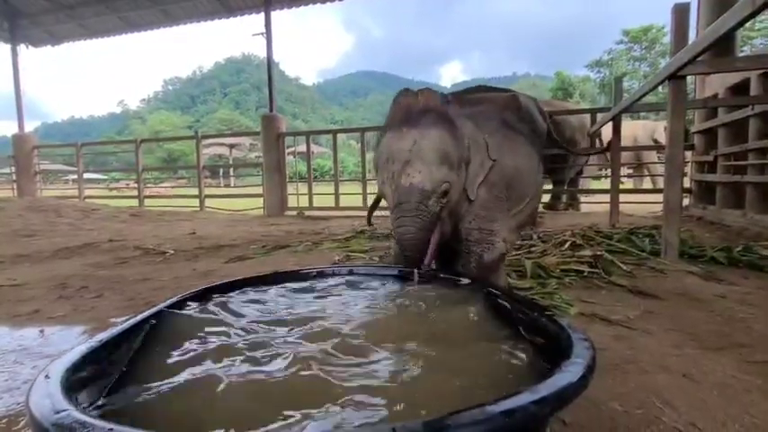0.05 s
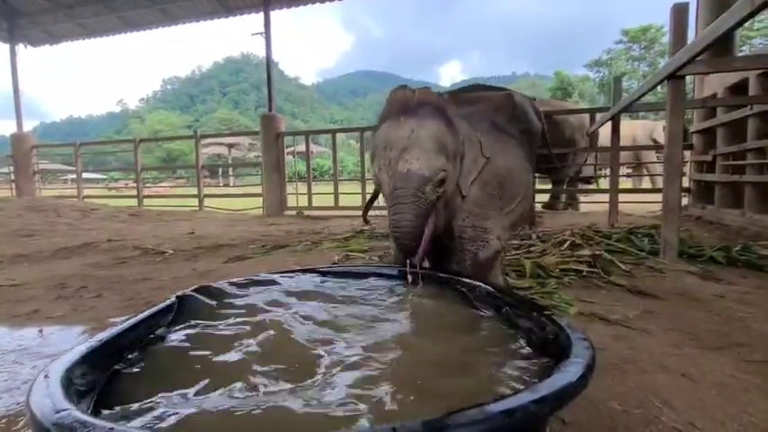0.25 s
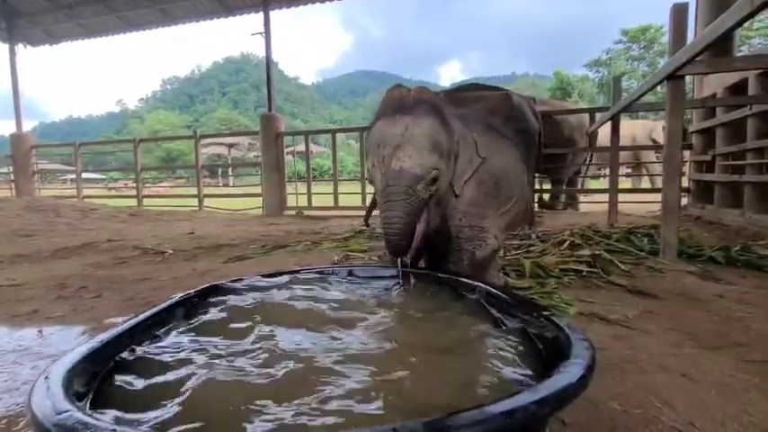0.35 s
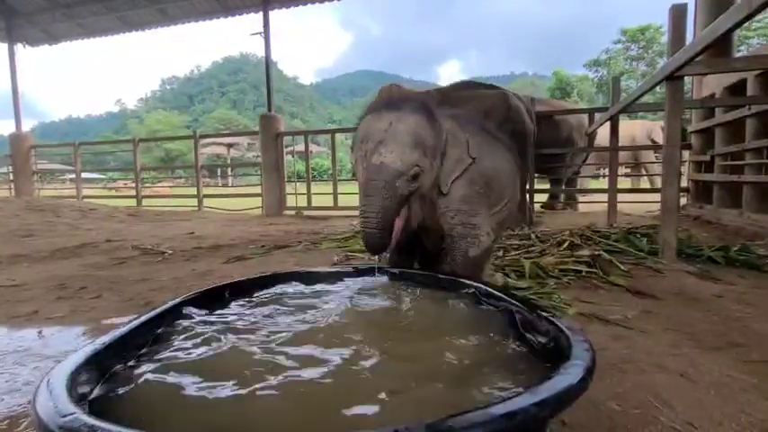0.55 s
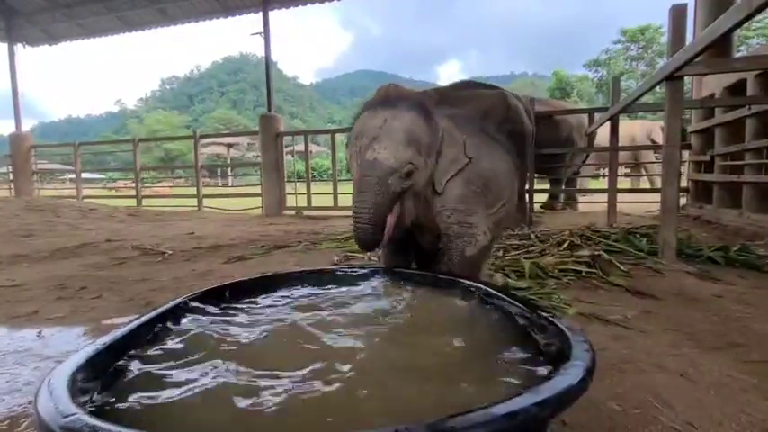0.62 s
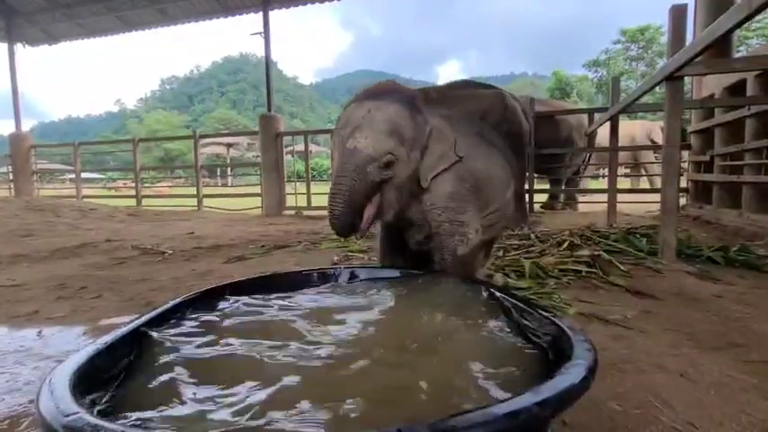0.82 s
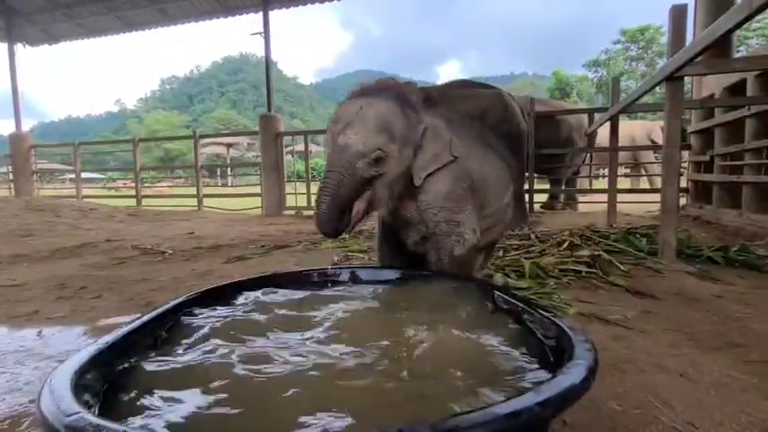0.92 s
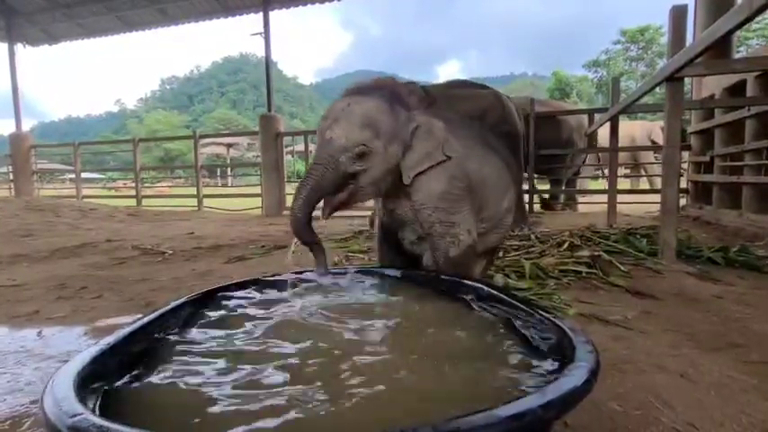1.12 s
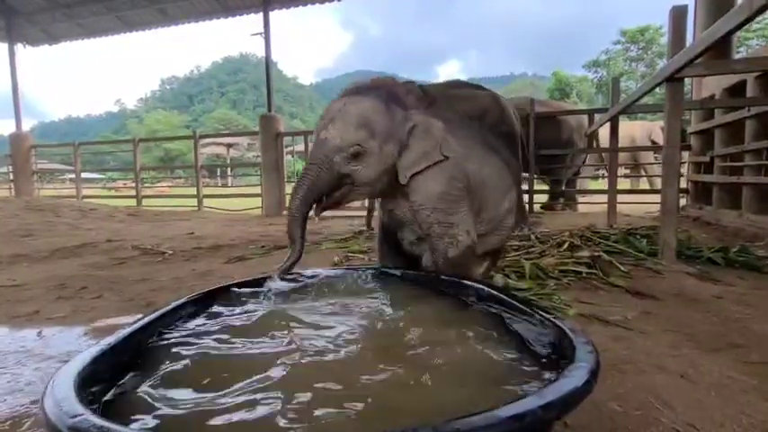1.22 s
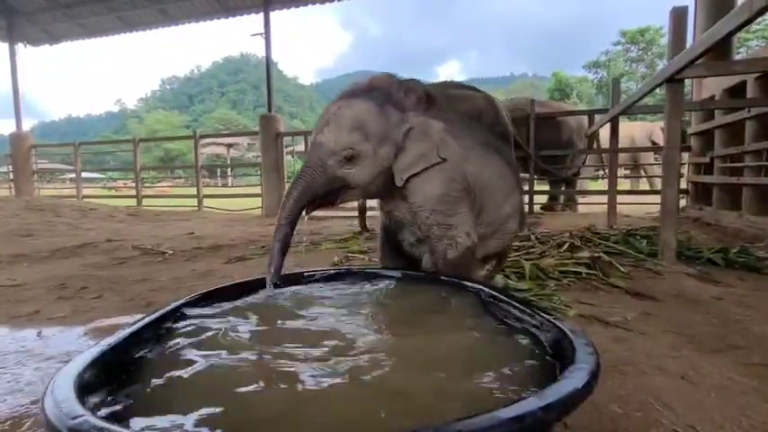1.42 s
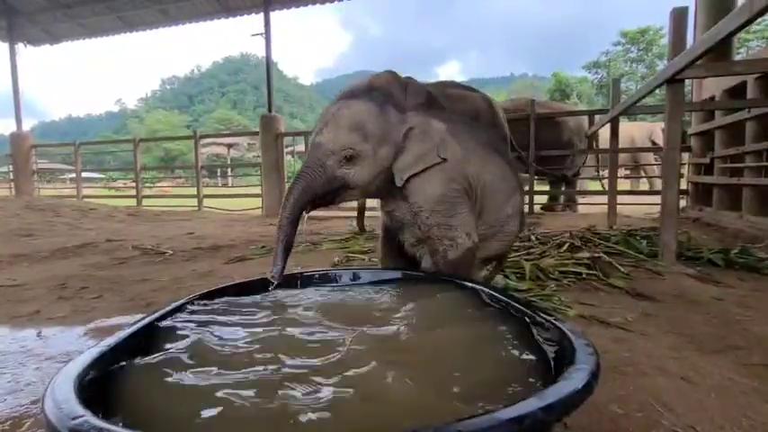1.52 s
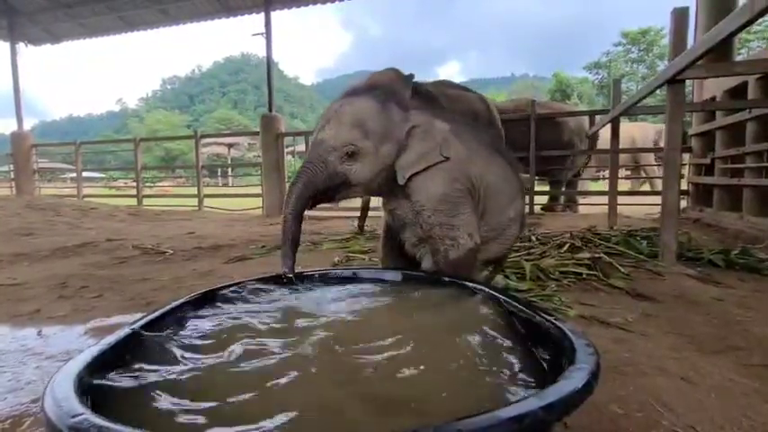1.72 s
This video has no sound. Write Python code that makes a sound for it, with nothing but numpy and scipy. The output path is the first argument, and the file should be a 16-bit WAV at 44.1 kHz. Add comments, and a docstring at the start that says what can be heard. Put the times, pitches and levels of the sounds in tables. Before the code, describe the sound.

A short, gurgling splash of water in a tub is followed by dribbling and a fine, uneven spatter from a young elephant's trunk. The water sounds near, in a roofed yard with a faint low rumble.

```python
"""In a yard, under an open roof, a young elephant stirs the water in a plastic tub.
A wave slops against the wall, trapping air pockets that gulp, then breaks into bubbles and spray.
Water dribbles back and drums on the tub, and the trunk sprays once more. Bubbles are short,
fading tones; slaps and splats are bursts of noise. The tub, roof and fence throw the sound
back, and the yard rumbles faintly."""
import sys
import numpy as np
from scipy import signal
from scipy.fft import rfft, irfft
from scipy.io import wavfile

SR = 44100
rng = np.random.default_rng(int(sys.argv[2]) if len(sys.argv) > 2 else 0)


def persist_wave(psi):
    """Save psi, clipped to +-1, as 16-bit WAV."""
    counts = np.round(np.clip(psi, -1, 1) * 32767).astype(np.int16)
    wavfile.write(sys.argv[1], SR, np.atleast_2d(counts).T)


N = 77175  # 1.75 seconds
BUBBLE_ATTACK_S, BUBBLE_RISE_PER_S = 0.00082, 0.17
SPRAY_PAN_DB = -2.65  # flying water is a little louder on the right

# Slops against the wall. Each row: start in seconds, air pocket pitch in Hz, its level in dB,
# seconds before it fades, fade time in seconds (to fall by 60 dB), slap level in dB.
SLOP_HITS = [(0.224, 509, -16, 0.012, 0.034, -23), (0.244, 538, -20, 0.0036, 0.06, -50),
             (0.249, 513.7, -7, 0.002, 0.057, -21.5), (0.2851, 514, -18, 0.0013, 0.03, -23),
             (0.332, 500, -33, 0.0037, 0.035, -30), (0.339, 539, -19, 0.0062, 0.025, -43),
             (0.3893, 766, -11.5, 0.0017, 0.01, -42), (0.3936, 1022, -18.5, 0.0053, 0.019, -39),
             (0.394, 560, -21.5, 0.0054, 0.033, -44), (.444, 573, -24.5, 0.0019, 0.05, -30.5),
             (0.4475, 833, -32, 0.0021, 0.12, -46), (0.461, 990, -24.5, 0.0035, 0.028, -47),
             (0.583, 553, -26, 0.0021, 0.024, -42), (1.242, 530, -36, 0.011, 0.039, -50),
             (1.260, 520, -36, 0.02, 0.14, -34.5), (1.2811, 565.6, -29, 0.0099, 0.038, -62)]
# The tone of a water slap. Each row: frequency in Hz, relative level in dB.
SLAP_TONE = [(25, -50), (80, -32), (145, -9), (205, -21), (280, 0), (400, -5.5), (800, 3.5), (1400, -7.5),
             (2000, -19.5), (2800, -39), (5000, -33), (14000, -40)]
def slops():
    """Each slop slaps the wall and sets a trapped pocket of air ringing."""
    out = np.zeros((2, N))
    for start, hz, db, hold, fade_s, slap_db in SLOP_HITS:
        add(out, start, amp(db) * ring(hz, fade_s, attack_s=0.00095, rise_per_s=0.97, hold_s=hold))
        add(out, start, amp(slap_db) * burst(SLAP_TONE, fade_s=0.078))
    return out


# Single bubbles. Each row: start in seconds, pitch in Hz, level in dB, fade time in seconds,
# how much louder on the left in dB.
SINGLE_BUBBLES = [(.201, 1120, -36.5, .16, -7), (.226, 1390, -23.5, 0.029, 8),
                  (.24, 145.3, -42.5, 0.38, -1), (.251, 950, -18.5, 0.042, 1), (0.269, 3900, -28, .035, 2),
                  (.271, 1070, -20, 0.031, -2), (.294, 4610, -28, .026, 1), (.296, 3506, -26, 0.038, -3),
                  (0.3431, 1386, -19.5, 0.022, 10), (0.34, 3995, -23, 0.039, 12),
                  (0.341, 2433, -31.5, 0.092, -13), (.344, 3423, -26.5, 0.045, -7),
                  (.345, 2193, -23.5, 0.025, -11.5), (.346, 1982, -25.5, 0.099, -8.5),
                  (.351, 2373, -24.5, 0.042, -9), (.366, 1380, -28, 0.071, -6),
                  (.397, 4846, -31.5, 0.041, -4), (.40, 1690, -31, 0.051, 6),
                  (.419, 1032, -26.5, 0.037, -2), (0.448, 1402, -27, 0.09, 1), (.449, 1020, -22, 0.1, 0),
                  (0.465, 1360, -24, 0.021, -7), (.513, 7540, -30, 0.017, 1),
                  (.521, 3950, -33.5, 0.035, -4), (0.538, 1930, -31.5, 0.094, -2),
                  (.636, 1160, -38.5, 0.11, -4), (0.697, 3070, -36, 0.024, -4), (.903, 1564, -33.5, .04, 8),
                  (.921, 565, -40, 0.051, -1), (0.921, 1365, -43, 0.08, 0),
                  (0.965, 7340, -31.5, 0.014, 10.5), (1.022, 4770, -32.5, 0.026, -10),
                  (1.183, 276, -35, .09, 0), (1.198, 2086, -24, 0.032, -5), (1.244, 1340, -30, 0.037, 2),
                  (1.252, 1036, -34.5, 0.07, -5), (1.349, 1190, -35.5, 0.028, -13),
                  (1.657, 1444, -40, 0.052, 6)]
def bubbles():
    """Single bubbles plink and flutter on the moving surface."""
    out = np.zeros((2, N))
    for start, hz, db, fade_s, side_db in SINGLE_BUBBLES:
        plink = ring(hz, fade_s, BUBBLE_ATTACK_S, BUBBLE_RISE_PER_S)
        # A complex gain shakes both loudness and pitch.
        shake = wobble(len(plink), rate_hz=75) + 1j * wobble(len(plink), rate_hz=75)
        fluttering = (signal.hilbert(plink) * (1 + 0.33 * shake)).real
        add(out, start, amp(db) * pan(side_db) * fluttering)
    return out


# Water falling back. Each row: start in seconds, level in dB, multiplier for the tub's pitches.
DRIBBLE_HITS = [(0.445, -33, 0.98), (.519, -35.5, .88), (.531, -35, 0.97), (.543, -32.5, 1), (.558, -33, 1),
                (0.619, -37, 1.14), (0.669, -43, 1.01), (0.697, -41.5, 1.13), (0.727, -41.5, 1.08),
                (.793, -37.5, 1.06), (.843, -36.5, 1.03), (1.329, -44, 1.05), (1.385, -46, 1.03)]
# The filled tub's notes. Each row: pitch in Hz, relative level in dB, fade time in seconds.
TUB_NOTES = [(298, -47, 0.022), (350.5, 1.5, 0.15), (386, -10, 0.11), (555, -4, 0.059), (1024, -0.5, 0.027),
             (1400, -24, .25)]
def dribbles():
    """Falling water splats and rings the tub like a drum."""
    out = np.zeros((2, N))
    for start, db, pitch in DRIBBLE_HITS:
        tub = sum(amp(note_db) * ring(hz * pitch, fade_s, BUBBLE_ATTACK_S)
                  for hz, note_db, fade_s in TUB_NOTES)
        add(out, start, amp(db) * tub)
        add(out, start, amp(db - 2) * burst(SLAP_TONE, fade_s=0.023))
    return out


# How the churning swells. Each row: time in seconds, level in dB.
CHURN_LEVEL = [(0, -56.5), (.21, -53.5), (.235, -36), (.31, -31.5), (.38, -47.5), (.43, -42), (.475, -34),
               (.5, -33.5), (.555, -35), (.6, -43.5), (.67, -50.5), (.8, -49), (.97, -53), (1.16, -48),
               (1.26, -48.5), (1.4, -53.5), (1.62, -61), (1.75, -49.5)]
# Its tone. Each row: frequency in Hz, relative level in dB.
CHURN_TONE = [(150, -31), (260, 0), (350, 0.5), (600, -3), (1000, 0), (1500, -1), (2200, -11),
              (3200, -11.5), (6000, -27)]
def churn():
    """A crowd of small bubbles rings in the stirred water."""
    crowd = shower(297.9, 3243, per_s=1500, spread_db=3, cycles=8.8)
    return level(CHURN_LEVEL) * colour(crowd, CHURN_TONE)


# The splash of the breaking wave. Each row: time in seconds, level in dB.
SPLASH_LEVEL = [(.215, -81), (.232, -36), (.258, -38.5), (.28, -38), (.295, -31), (.31, -45), (.33, -41),
                (.345, -38), (.36, -56), (.42, -61)]
# Its tone. Each row: frequency in Hz, relative level in dB.
SPLASH_TONE = [(1650, -40), (2800, -31), (4170, 5), (5380, -10.5), (6710, -0.5), (7600, 0), (8480, -18),
               (11000, -12), (14500, -18)]
def splash():
    """Droplets flung up by the wave crackle as they land."""
    droplets = shower(2810, 15600, per_s=2200, spread_db=2.5, cycles=8)
    return level(SPLASH_LEVEL) * pan(SPRAY_PAN_DB) * colour(droplets, SPLASH_TONE)


# Spray from the trunk. Each row: time in seconds, relative level in dB.
SPRAY_LEVEL = [(0, -52), (.21, -58.5), (.43, -53.5), (.55, -49.5), (.66, -48.5), (.76, -53), (.785, -41),
               (.82, -49.5), (.94, -61), (1.03, -50), (1.1, -42.5), (1.134, -45.5), (1.17, -42.5),
               (1.185, -36.5), (1.225, -38.5), (1.26, -36.5), (1.3, -42), (1.325, -39), (1.36, -48.5),
               (1.496, -57.5), (1.656, -59), (1.706, -44.5), (1.75, -55.5)]
# Its tone. Each row: frequency in Hz, relative level in dB.
SPRAY_TONE = [(300, -32), (900, -34), (1300, -11), (1600, -12), (2170, -2.5), (2600, -6), (3360, -1),
              (4060, -4.5), (6920, -3.5), (8000, -6.5), (8940, -18), (11000, -12), (14300, -12)]
def spray():
    """Fine droplets from the trunk fizz on the water in uneven spurts."""
    droplets = shower(933, 13400, per_s=9000, spread_db=2, cycles=1.32)
    fizz = colour(droplets, SPRAY_TONE)
    spurts = amp(2.5 + 1.5 * wobble(N, rate_hz=45)[0])
    return spurts * level(SPRAY_LEVEL) * pan(SPRAY_PAN_DB) * fizz


# How the dripping comes and goes. Each row: time in seconds, level in dB.
DRIP_LEVEL = [(0, -66), (.3, -54), (.45, -53), (.55, -48), (.7, -53), (.8, -44), (.95, -59.5), (1.1, -59),
              (1.2, -42), (1.33, -43.5), (1.45, -70), (1.75, -66)]
# Its tone. Each row: frequency in Hz, relative level in dB.
DRIP_TONE = [(1500, -8), (2200, -2), (3000, 4.5), (5000, -4), (7500, 1), (9000, -37), (14000, -22)]
def drips():
    """Larger drops fall back, each with a tiny ringing bubble."""
    drops = shower(1701, 11000, per_s=260, spread_db=3, cycles=11)
    return level(DRIP_LEVEL) * pan(SPRAY_PAN_DB) * colour(drops, DRIP_TONE)


# Nearby drops. Each row: start in seconds, level in dB, fade time in seconds,
# centre pitch in Hz, width in octaves.
DROP_TICKS = [(.202, -40, .012, 6500, 0.55), (0.227, -32.5, .016, 5000, 1), (0.2704, -29, .012, 4200, 0.33),
              (0.285, -25, 0.013, 6000, 0.29), (0.2966, -28, .014, 6100, 0.29),
              (0.3427, -21.5, 0.02, 3820, 0.25), (0.3423, -26, 0.013, 13500, .3),
              (.398, -28, 0.018, 4600, 0.26), (.3985, -32.5, 0.015, 14000, 0.13),
              (.5555, -32, .005, 5000, .5), (.7628, -30, .007, 11500, .6), (.9641, -33, .012, 7200, .2),
              (1.6335, -37, .009, 13000, .5), (1.683, -35, 0.013, 4200, .5)]
def ticks():
    """A few near drops land with a sharp tick, each around its own pitch."""
    out = np.zeros((2, N))
    hz = np.geomspace(1000, 15000, num=40)
    for start, db, fade_s, centre_hz, octaves in DROP_TICKS:
        peak_db = -5 * (np.log2(hz / centre_hz) / octaves) ** 2
        tone = np.column_stack([hz, np.maximum(peak_db, -31)])
        add(out, start, amp(db) * burst(tone, fade_s))
    return out


# First echoes from the fence and roof. Each row: delay in seconds, level in dB.
FIRST_ECHOES = [(.0095, -11), (0.0245, -25.5)]
def echoes(water):
    """Echoes come back thin in the bass, with sides swapped and the left a little late."""
    thin = signal.sosfilt(signal.butter(2, 706, "high", fs=SR, output="sos"), water)
    out = np.zeros((2, N))
    for delay, db in FIRST_ECHOES:
        add(out[:1], delay + 0.0003, amp(db) * thin[1])
        add(out[1:], delay, amp(db) * thin[0])
    return out


# The lingering sound. Each row: frequency in Hz, level in dB, fade time in seconds.
REFLECTION_BANDS = [(208, 0.5, 0.37), (635, -23.5, 0.33), (1160, -12.5, 0.2), (2240, -0.5, 0.31),
                    (5200, -10.5, 0.61), (11000, -2.5, 0.067)]
def reflections(water):
    """Many small bounces off the tub, ground and roof blur into a tail, different at each ear."""
    bounces = rng.standard_normal((2, SR // 2)) * (rng.random((2, SR // 2)) < 2500 / SR)
    hz, t, bands = signal.stft(unit(bounces), SR, nperseg=256)
    table = np.array(REFLECTION_BANDS)
    db = look_up(table[:, [0, 1]], hz)[:, None]
    decay = np.log(1000) / look_up(table[:, [0, 2]], hz)[:, None]
    gain = amp(db) * np.sqrt(2 * decay / SR)  # a longer fade adds no energy
    tail = signal.istft(bands * gain * np.exp(-decay * t), SR, nperseg=256)[1]
    return signal.fftconvolve(water, tail, axes=1)[:, :N]


# The tone of the background. Each row: frequency in Hz, relative level in dB.
YARD_TONE = [(20, -24), (40, -12), (62, 1), (95, 1), (140, -6), (220, -17), (500, -21), (1100, -21),
             (2000, -23), (4000, -28), (7000, -28), (10000, -36), (14500, -35)]
def yard():
    """Steady low rumble and faint outdoor hiss."""
    return amp(-48.5) * colour(rng.standard_normal((2, N)), YARD_TONE) * pan(-1.1)


def ring(hz, fade_s, attack_s, rise_per_s=0, hold_s=0):
    """A dying tone; its pitch can rise, as a bubble's does near the surface."""
    t = np.arange(SR // 4) / SR
    onset = 1 - np.exp(-t / attack_s)
    fade = 1000 ** (-np.maximum(t - hold_s, 0) / fade_s)
    return onset * fade * np.sin(2 * np.pi * hz * (t + rise_per_s * t * t / 2))


def burst(tone, fade_s):
    """A short splat of noise with the given tone."""
    t = np.arange(SR // 5) / SR
    onset = 1 - np.exp(-t / 0.00024)
    return colour(rng.standard_normal((2, len(t))), tone) * onset * 1000 ** (-t / fade_s)


def shower(low_hz, high_hz, per_s, spread_db, cycles, pitches=32):
    """Tiny rings at random times and strengths, each fading over the given number of cycles."""
    out = np.zeros((2, N))
    for hz in np.geomspace(low_hz, high_hz, pitches):
        hits = rng.random((2, N)) < per_s / pitches / SR
        strength = amp(spread_db * np.minimum(rng.exponential(1, (2, N)), 4))
        fade_s = np.log(1000) * cycles / hz  # down to about a third after that many cycles
        ping = ring(hz, fade_s, 0.5 / hz, BUBBLE_RISE_PER_S)[:SR // 10]
        out += signal.oaconvolve(hits * strength, hz * ping[None], axes=1)[:, :N]
    return out


# How alike the two ears' sounds are. Each row: frequency in Hz, likeness from 0 to 1.
EAR_LIKENESS = [(30, 1), (500, 0.83), (900, 0.45), (1400, 0.51), (2200, 0.14), (14000, 0.052)]
def colour(pair, tone):
    """Gives two unrelated signals a tone; the bass is shared, the treble stays apart."""
    hz = np.fft.rfftfreq(pair.shape[1], 1 / SR)
    left, other = rfft(pair) * amp(look_up(tone, hz))
    same = np.clip(look_up(EAR_LIKENESS, hz), 0, 1)
    right = same * left + np.sqrt(1 - same ** 2) * other
    return unit(irfft(np.array([left, right]), pair.shape[1]))


def left_first(pair, lead_s):
    """Lets a sound reach the right ear a little later."""
    delay = np.exp(-2j * np.pi * np.fft.rfftfreq(N, 1 / SR) * lead_s)
    return np.array([pair[0], irfft(rfft(pair[1]) * delay, N)])


def narrow_bass(pair, bass_width=0.51, edge_hz=410):
    """Long sound waves reach both ears more alike than short ones."""
    hz = np.fft.rfftfreq(N, 1 / SR)
    width = 1 - (1 - bass_width) / (1 + (hz / edge_hz) ** 4)
    side = irfft(rfft(pair[0] - pair[1]) / 2 * width, N)
    return pair.mean(0) + np.array([side, -side])


def wobble(size, rate_hz):
    """Smooth random flutter, different at each ear."""
    hz = np.fft.rfftfreq(size, 1 / SR)
    noise = rfft(rng.standard_normal((2, size)))
    return unit(irfft(noise * np.exp(-(hz / rate_hz) ** 2), size))


def amp(db):
    """Turns decibels into a gain."""
    return 10 ** (np.asarray(db) / 20)


def unit(x):
    """Scales a signal to an average power of 1."""
    return x / np.sqrt(np.mean(x ** 2) + 1e-20)


def look_up(points, hz):
    """Reads between a table's rows on a log-frequency axis."""
    row_hz, value = np.transpose(points)
    return np.interp(np.log(hz + 1), np.log(row_hz + 1), value)


def level(points):
    """A gain for every sample, from rows of seconds and dB."""
    return amp(np.interp(np.arange(N) / SR, *np.transpose(points)))


def pan(db):
    """Left and right gains; positive dB is louder on the left."""
    return amp(np.array([[db], [-db]]) / 2)


def add(mix, start_s, sound):
    """Mixes a sound in at its start time."""
    part = mix[:, max(round(start_s * SR), 0):][:, :sound.shape[-1]]
    part += sound[..., :part.shape[1]]


def scene():
    """The water, its echoes and reflections, and the yard behind them."""
    tub = (slops() + dribbles() + churn()) * pan(-0.3) + bubbles() + splash() + ticks()
    water = left_first(tub, lead_s=0.00006) + left_first(spray() + drips(), lead_s=0.00035)
    return narrow_bass(water + echoes(water) + reflections(water)) + yard()


def record(dry):
    """Cuts the treble above 14450 Hz."""
    low_pass = signal.firwin(511, 14450, window=("kaiser", 9), fs=SR)
    return signal.oaconvolve(dry, low_pass[None], "same")


dry = scene()
out = record(dry)
persist_wave(out)
```